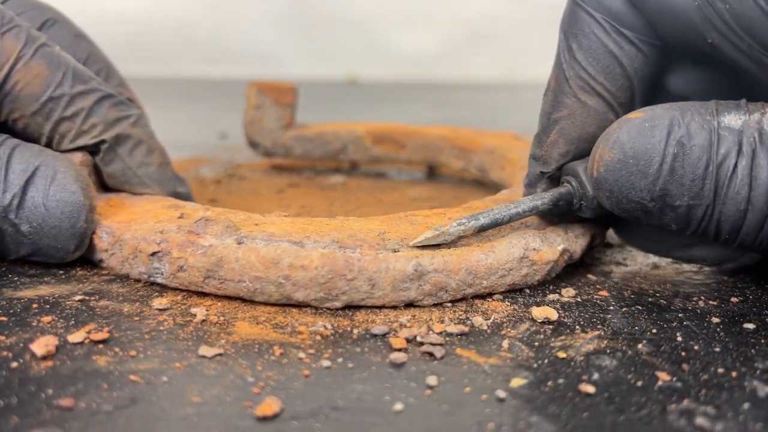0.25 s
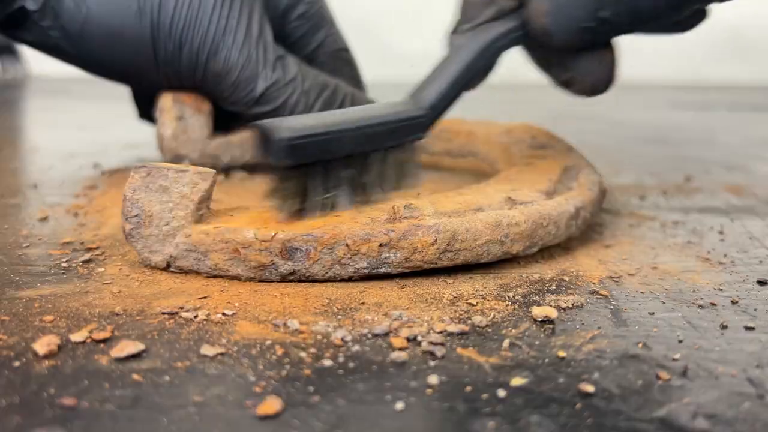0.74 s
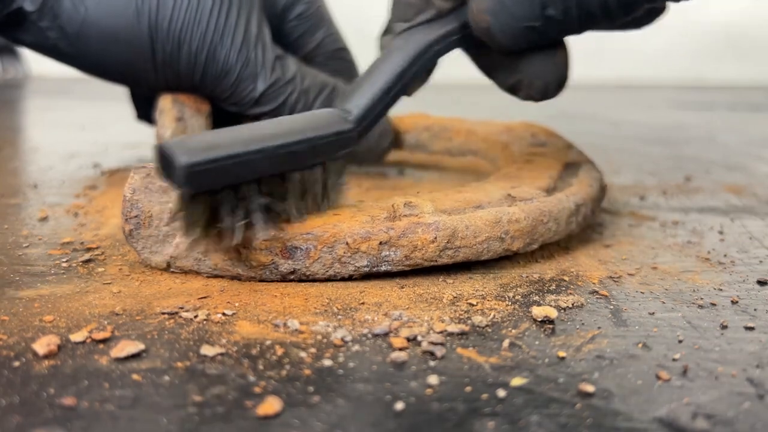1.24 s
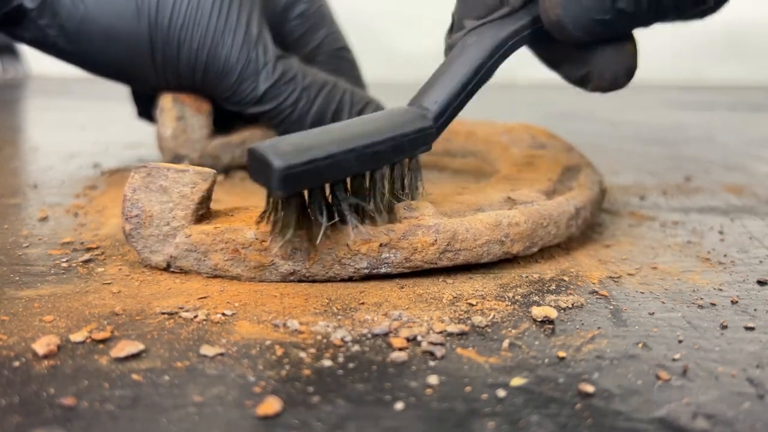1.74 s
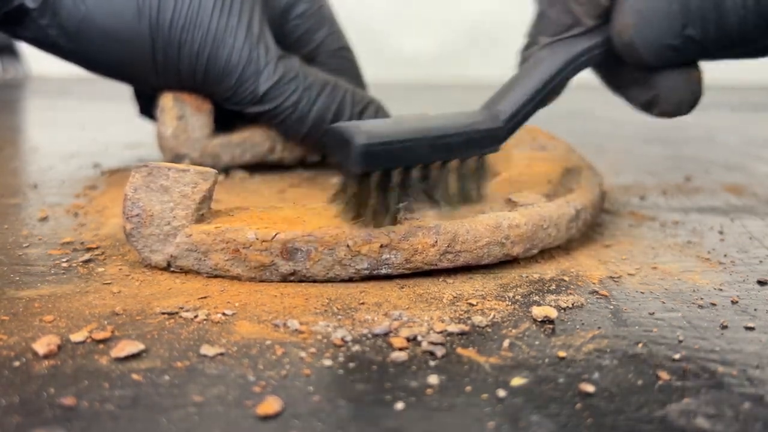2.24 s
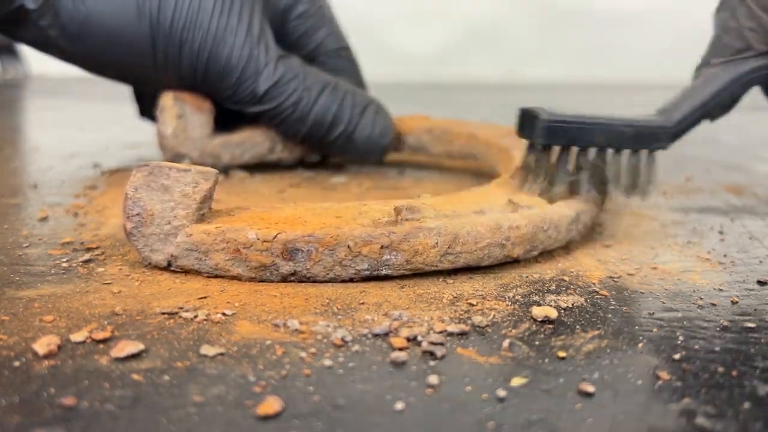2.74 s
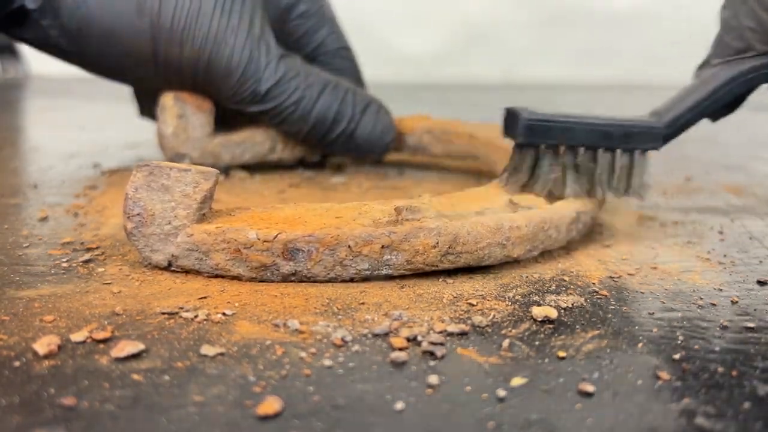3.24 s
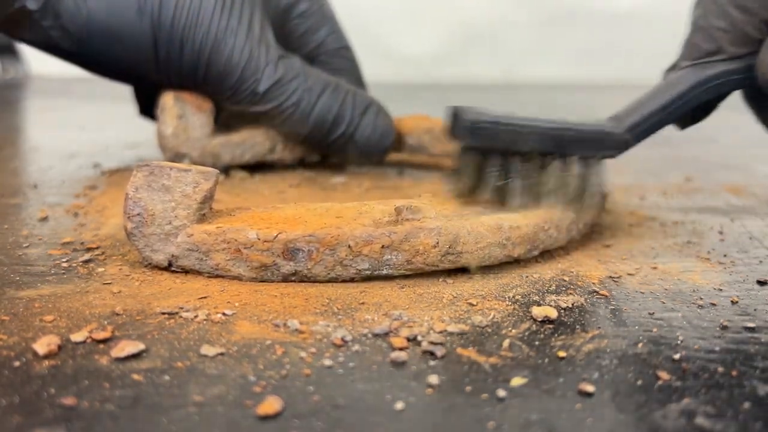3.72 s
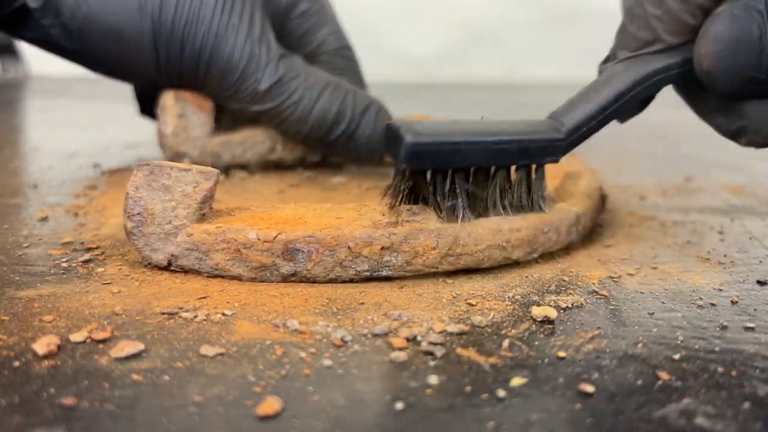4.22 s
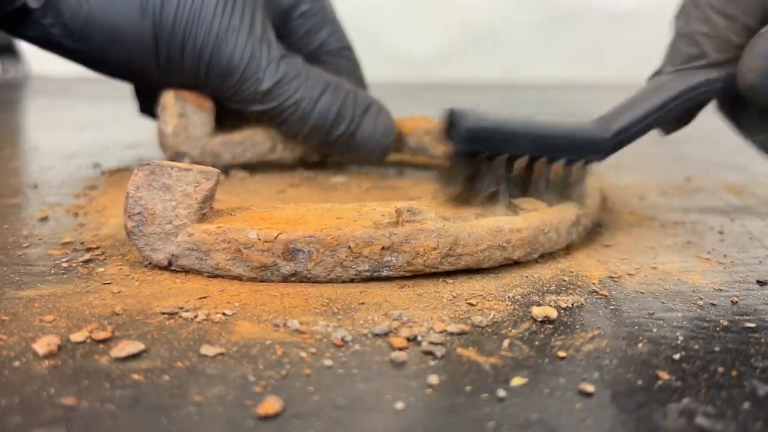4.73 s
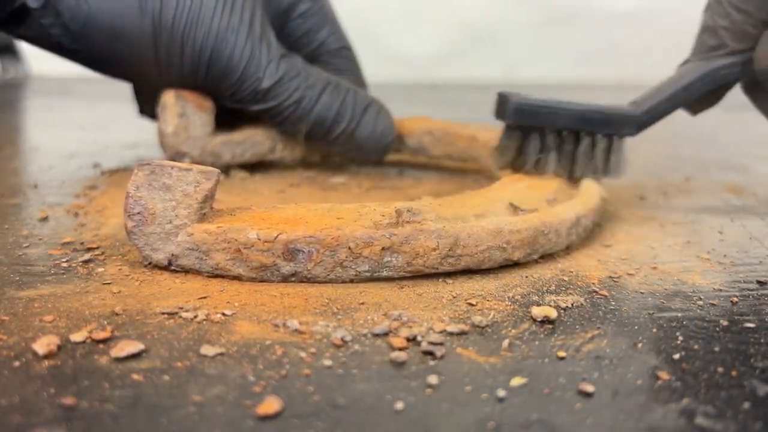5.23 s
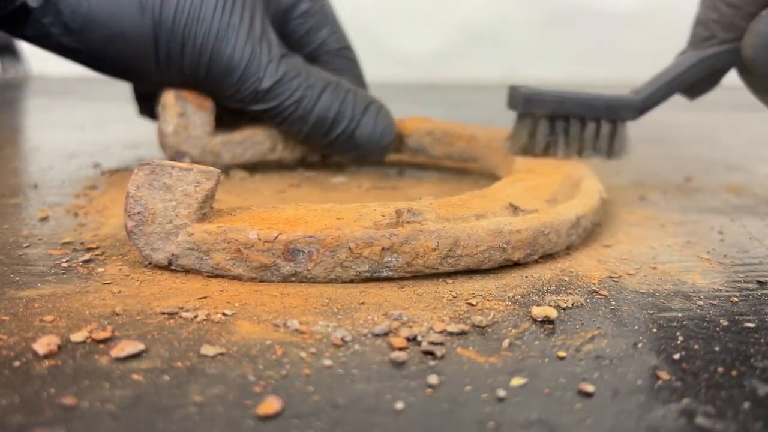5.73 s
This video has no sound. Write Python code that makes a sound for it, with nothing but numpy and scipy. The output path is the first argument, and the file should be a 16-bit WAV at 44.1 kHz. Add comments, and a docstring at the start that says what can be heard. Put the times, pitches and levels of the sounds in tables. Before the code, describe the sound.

First come several irregular cracks and faint grit from a pointed tool on rusty iron, strongest just before half a second. From about three quarters of a second, stiff bristles rasp quickly back and forth until the end, pulls and pushes differing slightly. Thin high metal ringing, occasional abrupt bristle bites, woody knocks and soft low thuds accompany it. Very close stereo pickup in a fairly dry workshop.

```python
"""A wire brush scrubs an old horseshoe to and fro on a workshop bench, close to a two-port microphone.
Bristle slips, as bunched noise, hiss, ring the iron's modes and shake the bench; tufts bite, the shoe knocks.
Before the brush a steel pick chips and scratches off rust: noise cracks, blows into the iron, fine grit.
Behind it all lies a short workshop tail; the two ports hear partly different sound."""
import sys
import numpy as np
from scipy import signal
from scipy.fft import rfft, irfft, next_fast_len
from scipy.io import wavfile
from scipy.ndimage import uniform_filter1d

SR = 44100
rng = np.random.default_rng(int(sys.argv[2]) if len(sys.argv) > 2 else 0)


def how_loud(loudness_db):
    """Turn decibels into a plain amplitude multiplier (0 dB gives 1, 20 dB gives 10)."""
    steps = np.asarray(loudness_db, float) / 20
    return 10 ** steps


def file_out(sig):
    """Save sig as 16-bit WAV at sys.argv[1]."""
    # one column per channel
    cols = np.atleast_2d(sig).T
    # limit, then scale
    lim = np.clip(cols, -1, 1)
    pcm = np.round(lim * 32767).astype(np.int16)
    wavfile.write(sys.argv[1], SR, pcm)


N = 263277
SIZE = next_fast_len(N + SR)
HZ = np.fft.rfftfreq(SIZE, 1 / SR) + 1e-3  # kept off zero
T = np.arange(N) / SR


def brush():
    """One hand force drives every brush sound: hiss, dull scratch, iron ring and shaken bench."""
    force, speed, middle = hand_strokes()
    dull_db = dull_levels()
    out = hiss(force) + dull_scratch(force, speed, middle, dull_db)
    out += iron_ring(force, middle, dull_db)
    shake = force * slips(2.0, 2.4, 45)
    return out + bench_chatter(shake, middle) + bench_rumble(shake, middle)


# Brush strokes at the shoe, pulls and pushes by turns: starting turn t/s, force level at that turn/dB
# (first row's unused), force level at full speed/dB, bench-top chatter relative level/dB
BRUSH_STROKES = [(0.68, -58, -42.5, -0.5), (0.828, -66, -40, -1.5), (0.984, -62.5, -45.5, 0.5),
                 (1.112, -63, -40.5, -0.5), (1.238, -63, -43.5, -2), (1.389, -63, -44.5, 3),
                 (1.525, -66, -41, -5), (1.661, -66, -43, 2.6), (1.8, -62, -43.5, -3),
                 (1.917, -61.5, -43, 0.5), (2.069, -67.5, -42.5, 0), (2.195, -66, -41.5, -2.5),
                 (2.336, -61, -43.5, -0.5), (2.489, -69, -45.5, 3.5), (2.615, -60.5, -42, -3.5),
                 (2.756, -62, -45, 4), (2.898, -70.5, -43.5, -2), (3.026, -58, -45.5, 5.2),
                 (3.174, -62, -42.5, -2.5), (3.291, -60.5, -42.5, -2.5), (3.443, -59, -43.5, 1.5),
                 (3.575, -64.5, -43, 2), (3.697, -59, -41.5, -4.5), (3.837, -58, -41.5, -0.5),
                 (4.009, -63, -42, -3), (4.149, -56, -44.5, -2.5), (4.27, -66, -43.5, 0),
                 (4.406, -56, -40.5, -8), (4.536, -62, -42.5, -2.5), (4.672, -56.5, -41, -5),
                 (4.8, -58, -40, -6), (4.928, -59.5, -41, -2.5), (5.077, -57, -41.5, -1.5),
                 (5.211, -60.5, -41, -1.5), (5.341, -56.5, -42, -4.5), (5.487, -59, -41.5, -11.5),
                 (5.625, -53.5, -41.5, -3), (5.748, -53.5, -43.5, -55.5), (5.885, -54.5, -38, -3)]
# Where in the stroke the brush is fastest: t/s, pull (0-1), push (0-1)
FASTEST_POINT = [(.8, .55, 0.48), (1.6, 0.48, 0.38), (2.8, 0.52, 0.53), (3.7, 0.45, 0.57), (5.5, 0.5, 0.6),
                 (5.9, 0.51, .45)]


def hand_strokes():
    """The hand swings like a pendulum: slow and quiet at each turn, loud in mid stroke."""
    last_turn_s, brush_down_s = 6.02, 0.743
    hold_share = 0.58  # force withheld just before a bite
    turn, slow_db, fast_db, _ = np.transpose(BRUSH_STROKES)
    edges = np.append(turn, last_turn_s)
    middle = (edges[1:] + edges[:-1]) / 2
    which = np.clip(np.searchsorted(edges, T) - 1, 0, len(turn) - 1)
    part = np.clip((T - edges[which]) / np.diff(edges)[which], 0, 1)
    # bend the stroke so that its half-way phase falls at the fastest point
    centre = by_direction(*np.transpose(FASTEST_POINT), middle)
    skew = np.log(0.5) / np.log(centre[which])
    speed = np.sin(np.pi * part ** skew) ** 0.53
    base_db = np.interp(T, turn[1:], slow_db[1:])
    force = how_loud(base_db + (fast_db[which] - base_db) * speed)
    force *= np.clip((T - brush_down_s) / 0.0014, 0, 1)
    for bite, *_, hold_s in TUFT_SNAGS:
        force *= 1 - hold_share * np.exp(-np.abs(T - bite) / hold_s) * (T < bite)
    return force, speed, middle


def dull_levels():
    """A push bears down harder than a pull; the dull scratch follows a louder stroke only in part."""
    typical_db, follows = -43, 0.56
    fast_db = np.transpose(BRUSH_STROKES)[2]
    pull_push_db = np.resize((-9.5, -6), len(fast_db))
    return pull_push_db - (1 - follows) * (fast_db - typical_db)


# Colour of the bristle slips: f/Hz, relative level per Hz/dB
BRISTLE_COLOUR = [(900, -25), (1500, -10.5), (3000, -7.5), (5000, -4.5), (7300, -4), (8500, -4), (9800, -6),
                  (11500, -2.5), (13500, -5.5), (15500, -3)]


def hiss(force):
    """The finest slips, heard above 8 kHz only."""
    fine = slips(1.8, 1.6, 150)
    return how_loud(4.5) * force * unit(through(fine, how_loud(along(BRISTLE_COLOUR)) * (HZ > 8000)))


def dull_scratch(force, speed, middle, dull_db):
    """Coarser slips below 8 kHz in five bands; they need speed, so they drop further at the turns."""
    limits = ((0, 1600), (1600, 2800), (2800, 4200), (4200, 5800), (5800, 8000))  # Hz
    bands = [how_loud(along(BRISTLE_COLOUR)) * (HZ > lo) * (HZ <= hi) for lo, hi in limits]
    dull = unit(patchy(slips(2.6, 2.2, 120), bands, 2.8, 30))
    return force * how_loud(np.interp(T, middle, dull_db) + 3 - 4.5 * (1 - speed)) * dull


# The shoe's modes: f/Hz
IRON_MODES = [727, 1850, 2390, 3617, 4317, 5200, 5587, 6150, 6390, 6870, 8250, 8350, 8650, 10780, 11955,
              12500, 13100, 15455]
# One row for each of them: t60/s, relative level under the brush/dB, relative level under the pick/dB,
# family (1 bending, 2 middle, 3 high, 4 driven like the dull scratch)
IRON_RING = [(0.095, -1.5, -13.5, 1), (0.027, -6, -5, 4), (0.03, -7, -10, 4), (0.03, -10, -41, 4),
             (0.025, -10, -24, 4), (0.04, -9, -10, 4), (0.061, -4.5, -16, 4), (0.062, 4, -4.5, 2),
             (0.035, -25, 5, 2), (.025, -14, -10, 2), (0.12, 12.5, -32, 3), (0.14, 9, -16, 3),
             (0.037, 9.5, 0.5, 3), (0.078, -10, -7, 3), (0.053, -24, 2, 3), (0.11, -9, -6, 3),
             (.05, -28, -16, 3), (0.072, 5, -4, 3)]
# Place on the shoe, as the brush travels round it: t/s, then relative level/dB of the
# bending mode, middle modes on a pull, on a push, high modes on a pull, on a push
PLACE_ON_SHOE = [(.8, -33, -11, -16, -1.5, -4), (1.35, -28, -8, -16, -0.5, -2),
                 (1.65, -32, -21, -7, -24, 2), (2.2, -23, -15.5, -18, -7, -4.5),
                 (2.6, -9.5, -13, -5.5, -15, -2.5), (3.1, -12, -13.5, -0.5, -10.5, -0.5),
                 (3.5, -14, -6, -5, 0.5, -7.5), (3.9, -12.5, -13.5, -3, -2, -5.5),
                 (4.4, -10.5, -13.5, -12, -7, -9), (4.8, -18, -4.5, -9, -6, -6),
                 (5.2, -14.5, -13.5, -11.5, -3, -5), (5.7, -20, -11.5, -20, -6.5, 1),
                 (5.95, -12, -15, 3, -9, 4)]


def iron_ring(force, middle, dull_db):
    """Bristle slips ring the shoe's modes; each family answers by the place that is brushed."""
    drive = force * slips(2.0, 1.8, 60)
    s, bend, mid_pull, mid_push, high_pull, high_push = np.transpose(PLACE_ON_SHOE)
    # family: (level at mid stroke/dB, gain/dB)
    families = {1: (np.interp(middle, s, bend), 33.7),
                2: (by_direction(s, mid_pull, mid_push, middle), 25.5),
                3: (by_direction(s, high_pull, high_push, middle), 11.6),
                4: (dull_db, 20.73)}
    out = np.zeros((2, N))
    for family, (family_db, gain_db) in families.items():
        modes = [resonance([(f, width(t60), db)])
                 for f, (t60, db, _, member) in zip(IRON_MODES, IRON_RING) if member == family]
        out += patchy(drive * how_loud(np.interp(T, middle, family_db) + gain_db), modes, 2.6, 22)
    return out


# The near end of the shoe under the brush lifts the three highest bench-top modes: t/s, relative level/dB
NEAR_END_LEVEL = [(.75, 6), (1.5, 5.5), (2.2, -1), (2.6, -6.5), (4, -8.5), (5.97, -5)]


def bench_chatter(shake, middle):
    """The whole shoe chatters on the bench top, which answers with low wooden modes."""
    shake_top = shake * how_loud(np.interp(T, middle, np.transpose(BRUSH_STROKES)[3]) + 22)
    near_end = how_loud(np.interp(T, *np.transpose(NEAR_END_LEVEL)))
    modes = bench_top()
    return patchy(shake_top, modes[:6], 3.2, 14) + through(shake_top * near_end, sum(modes[6:]))


# Whole-bench rumble: t/s, relative level on a pull/dB, relative level on a push/dB
BENCH_RUMBLE = [(.8, -8.5, 0), (1.7, -9.5, -5.5), (2.5, -6.5, -5.5), (3.0, -5.5, 0.5), (3.6, -6, 5),
                (4.3, -14, -1), (4.9, -15, -3), (5.4, -13.5, -5.5), (5.95, -6.5, -3)]
# The hand leaning on the far side swells the lowest bench mode: t/s, relative level/dB
HAND_LEAN = [(.75, -0.5), (2.5, 7), (3.5, -2), (4.4, 10.5), (5.97, 11)]


def bench_rumble(shake, middle):
    """The heavy bench answers the shaking 15 ms late."""
    late = np.exp(-2j * np.pi * HZ * 0.015)
    rumble_db = by_direction(*np.transpose(BENCH_RUMBLE), middle)
    shake_all = shake * how_loud(np.interp(T, middle, rumble_db) + 20)
    lean = how_loud(np.interp(T, *np.transpose(HAND_LEAN)))
    low, high = bench()
    return through(shake_all * lean, low * late) + through(shake_all, high * late)


# Tufts that hold fast after a turn and then bite all at once: bite t/s, relative level/dB,
# strongest colour f/Hz, hold t/s
TUFT_SNAGS = [(0.852, -35, 8000, 0.0076), (1.139, -46, 8000, 0.016), (1.685, -40, 6000, .015),
              (1.967, -42, 6000, 0.052), (2.103, -39, 6000, 0.0089), (2.507, -53, 6000, 0.0087),
              (2.937, -50, 5000, 0.017), (3.03, -35, 1400, 0.0055), (3.473, -40, 8000, 0.018),
              (3.705, -32.5, 6000, 0.0088), (4.187, -32, 6000, 0.018), (5.89, -29, 1500, 0.0063)]


def snags():
    """A bite is a noise burst that starts at once and melts into the stroke."""
    out = np.zeros((2, N + SR))
    t = np.arange(SR // 10) / SR
    for s, db, knee_hz, _ in TUFT_SNAGS:
        i = int(s * SR)
        out[:, i:i + len(t)] += how_loud(db - 9) * burst(len(t), knee_hz, 3, -6) * fade(t, 0.045)
    return out[:, :N]


# The shoe rocks and knocks on the bench top: t/s, relative level/dB, f/Hz (the nearest bench-top mode answers)
SHOE_KNOCKS = [(0.853, -44, 396), (1.422, -39, 444), (1.698, -34.5, 452), (1.86, -32.5, 439),
               (1.964, -39.5, 385), (2.101, -36, 452), (2.259, -48, 439), (2.403, -34.5, 517),
               (2.941, -38, 388), (3.222, -36, 452), (3.328, -38, 420), (3.492, -28, 455),
               (4.188, -34.5, 423.5), (4.575, -31, 538), (4.774, -28, 441), (4.84, -30, 536),
               (5.003, -34, 218), (5.106, -29.5, 447)]
# The hand's weight lands on the bench: t/s, relative level/dB, rise t/s
HAND_THUDS = [(1.71, -44, 0.028), (2.267, -36.5, 0.03), (3.379, -37, 0.045), (3.638, -44, 0.035),
              (3.929, -46, 0.042), (4.451, -36, 0.035), (4.988, -42, 0.05), (5.069, -37, 0.039),
              (5.286, -34, 0.04), (5.544, -31, 0.043), (5.649, -36, 0.035), (5.761, -29, 0.037),
              (5.829, -38, 0.04)]


def knocks():
    """A knock rings the nearest bench-top mode, a thud the whole bench."""
    thuds = sum(shove(s, db + 13, rise_s) for s, db, rise_s in HAND_THUDS)
    out = through(thuds, sum(bench()) / (1 + (HZ / 190) ** 4))
    nearest = [np.argmin(np.abs(np.array(BENCH_TOP_MODES) - hz)) for _, _, hz in SHOE_KNOCKS]
    modes = bench_top()
    for k in set(nearest):
        mode_db = BENCH_TOP_RING[k][1]
        pushes = sum(shove(s, db + 21.5 - mode_db, 0.011)
                     for (s, db, _), j in zip(SHOE_KNOCKS, nearest) if j == k)
        out += through(pushes, modes[k])
    return out


def shove(s, db, rise_s):
    """A short rough push, noise under a bell curve that peaks rise_s after s."""
    return how_loud(db) * np.exp(-((T - s - rise_s) / rise_s) ** 2) * rng.standard_normal((2, N))


# Chips struck off by the pick: t/s, level/dB, bench sway re that/dB, ring re that/dB,
# strongest colour f/Hz, treble tilt of the crack/dB per octave
PICK_CHIPS = [(0.0718, -22, -16, -17.5, 1950, -10.5), (0.2414, -35, -44, -10.5, 1230, -16.5),
              (0.266, -39, -31, -19, 1200, -21), (0.3592, -16, -58, -3.5, 2500, -18),
              (0.4235, -8.5, -39.5, -8, 2300, -4.5), (0.543, -37.5, -33, -16, 2500, -2),
              (0.56, -20, -46, -34, 9100, 9), (0.572, -27.5, -50, -31, 9000, 1),
              (0.6327, -50, -29, -37, 9000, -16), (0.733, -46, -41, -17, 9000, -5)]


def pick():
    """Each chip is a sharp crack with crumbling after it, a blow into the iron and a late sway of the bench."""
    sway_hz, sway_peak_s = 74.9, 0.032
    out, blows = np.zeros((2, N)), np.zeros((2, N))
    t = np.arange(SR // 5) / SR
    swell = (t / sway_peak_s * np.exp(1 - t / sway_peak_s)) ** 2
    sway = swell * (np.sin(2 * np.pi * sway_hz * t) - 0.33 * np.cos(4 * np.pi * sway_hz * t))
    for s, db, sway_db, ring_db, knee_hz, tilt_db in PICK_CHIPS:
        i = int(s * SR)
        crack = burst(len(t), knee_hz, 20, tilt_db) * np.minimum(t / 0.0008, 1) * fade(t, 0.009)
        crumble = burst(len(t), knee_hz, 4, tilt_db - 6) * fade(t, 0.06)
        out[:, i:i + len(t)] += how_loud(db) * (crack + how_loud(-22.5) * crumble + how_loud(sway_db) * sway)
        # loose scale rattles on as noise round 5.6 kHz, fainter after a duller chip
        rattle = burst(len(t), 5600, 40, -18) * fade(t, 0.26)
        out[:, i:i + len(t)] += how_loud(db + ring_db + tilt_db - 17) * rattle
        # a duller chip is a longer push, which drives the high modes less
        push_samples = np.clip(0.3 - 0.15 * tilt_db, 0.3, 8)
        push = (t[:64] + 1 / SR) * np.exp(-t[:64] * SR / push_samples)
        blows[:, i:i + 64] += how_loud(db + ring_db) * push / push.sum()
    # offset each level by bandwidth, so that a mode's starting level does not depend on its width
    iron = [(f, width(t60), db + 20 * np.log10(SR / 2 / np.pi / width(t60)))
            for f, (t60, _, db, _) in zip(IRON_MODES, IRON_RING)]
    return out + through(blows, resonance(iron) + how_loud(27) * sum(bench_top()))


# The point dragged through the rust: t/s, grit level/dB, bench murmur level/dB
POINT_DRAG = [(0, -82, -62), (.025, -64, -62), (.06, -71, -74), (0.083, -64, -38.5), (.14, -79, -64),
              (.2, -66, -66), (.25, -65.5, -59), (.33, -60, -56.5), (.46, -62, -47), (.53, -68, -61.5),
              (.58, -69, -58.5), (.66, -62.5, -66), (.7, -73.5, -65), (.74, -69, -64)]
# Short spills of the finest grit: start t/s, length t/s, level/dB
GRIT_SPILLS = [(0.071, 0.032, -57), (0.35, .11, -64), (.548, .035, -61), (.59, 0.087, -70),
               (0.73, .03, -75)]


def scratch():
    """Fine grit under the point, with the bench murmuring below; a trace of it stays under the brush."""
    s, grit_db, bench_db = np.transpose(POINT_DRAG)
    spill = sum(how_loud(db) * ((T > start) & (T < start + length)) for start, length, db in GRIT_SPILLS)
    spill = how_loud(-80.5) + uniform_filter1d(spill, int(0.02 * SR))  # steady floor, 20 ms edges
    grit = slips(1.6, 1.8, 80)
    below = 1 / (1 + (HZ / 8200) ** 12)  # splits body from the finest grit
    body = unit(through(grit, below * resonance([(1360, 130, 5), (2355, 180, 7), (5600, 9900, -7)])))
    fine = unit(through(grit, 1 - below))
    murmur = unit(through(slips(0.63, 3.2, 28), sum(bench()) + how_loud(-13) * sum(bench_top())))
    return how_loud(np.interp(T, s, grit_db)) * body + spill * fine + how_loud(np.interp(T, s, bench_db)) * murmur


# Bench-top modes near the shoe: f/Hz
BENCH_TOP_MODES = [235, 308, 400, 452, 545, 660, 839, 965, 1145]
# One row for each of them: width f/Hz, relative level/dB
BENCH_TOP_RING = [(42.7, -13), (40.5, -5.5), (38.5, -6.5), (24.5, 1.5), (32.4, -1.5), (29.8, -11.5),
                  (35.2, -8), (45, -14.5), (46.296, -15.5)]


def bench_top():
    """Responses of the bench-top modes near the shoe; the thick wood passes little above each."""
    return [resonance([(f, *row)]) / (1 + (HZ / f / 1.34) ** 4)
            for f, row in zip(BENCH_TOP_MODES, BENCH_TOP_RING)]


# Modes of the whole bench: f/Hz, width f/Hz, relative level/dB
WHOLE_BENCH = [(74, 26, 0), (133, 38, 2)]


def bench():
    """Responses of the whole bench's modes; it is too small to radiate the deepest bass."""
    return [resonance([mode]) / (1 + (48 / HZ) ** 2) for mode in WHOLE_BENCH]


def slips(rough_db, flutter_db, rate):
    """Two unrelated streams of tiny slips: uneven in size, arriving in bunches as tufts catch and let go."""
    size = how_loud(rough_db * rng.exponential(size=(2, N)) + flutter_db * wander(rate))
    return unit(rng.standard_normal((2, N)) * size)


def wander(rate):
    """Random levels held 1 / rate s and slewed."""
    k = int(SR / rate)
    return uniform_filter1d(np.repeat(rng.standard_normal(N // k + 1), k)[:N], k)


def patchy(x, responses, patchy_db, rate):
    """Each response is driven harder or softer by turns, as the bristles land on other spots."""
    total = sum(rfft(x * how_loud(patchy_db * wander(rate)), SIZE) * response for response in responses)
    return irfft(total, SIZE)[:, :N]


def burst(length, knee_hz, rise_db, tilt_db):
    """Two short noises, strongest at the knee, with slopes in dB per octave below and above it."""
    octave = np.log2(np.fft.rfftfreq(length, 1 / SR) / knee_hz + 1e-3)
    colour = how_loud(tilt_db * np.maximum(octave, 0) + rise_db * np.minimum(octave, 0))
    return unit(irfft(rfft(rng.standard_normal((2, length))) * colour, length))


def fade(t, t60):
    """Exponential decay by 60 dB in t60 seconds."""
    return 1000.0 ** (-t / t60)


def width(t60):
    """Bandwidth in Hz of a mode that dies 60 dB in t60."""
    return np.log(1000) / np.pi / t60


def resonance(modes, sign=-1):
    """Sum of (Hz, width, dB) resonators; sign -1 fills the valleys between them, 1 leaves notches."""
    total = 0
    for k, (f, w, db) in enumerate(modes):
        total = total + sign ** k * how_loud(db) * 1j * HZ * w / (f * f - HZ ** 2 + 1j * HZ * w)
    return total


def along(table):
    """A (Hz, value) table read at every frequency bin, on a log frequency axis."""
    hz, value = np.transpose(table)
    return np.interp(np.log(HZ), np.log(hz), value)


def through(x, response):
    """Filter by a frequency response."""
    return irfft(rfft(x, SIZE) * response, SIZE)[..., :N]


def unit(x):
    """Scale to rms 1."""
    return x / np.sqrt(np.mean(x ** 2))


def by_direction(s, pull, push, at):
    """Read a pull curve for even strokes and a push curve for odd ones."""
    return np.where(np.arange(len(at)) % 2, np.interp(at, s, push), np.interp(at, s, pull))


def workshop():
    """Response of the close sound plus a short noise tail, 18 dB down, that begins after 4 ms."""
    t = np.arange(SR // 3) / SR
    tail = rng.standard_normal(len(t)) * fade(t, 0.14) * (t > 0.004)
    tail = tail / np.sqrt(np.sum(tail ** 2))
    return 1 + how_loud(-18) * rfft(tail, SIZE) * resonance([(2500, 11500, 0.0074)])


# Likeness of the two microphone ports: f/Hz, likeness setting (1 = fully shared)
PORT_LIKENESS = [(60, 1), (290, 0.85), (640, 0.13), (1400, 0.12), (3100, 0.074), (6000, 0.073), (7400, 0.5),
                 (8200, 1)]
# Balance of the ports: f/Hz, left minus right level/dB
PORT_BALANCE = [(60, 2.5), (110, 0), (200, -0.5), (380, 1.5), (700, 4.5), (1290, -0.5), (2380, 3.5),
                (4400, 4), (8120, 1.5), (15000, -0.5)]
# Lead of the right port over the left: f/Hz, lead in cycles (negative: the left leads)
PORT_LEAD = [(6400, 0), (7100, -.25), (8330, 0), (10200, .5), (12000, 1), (13830, 1.5), (15600, 2)]


def two_ports(near):
    """A shared and an unshared stream, blended per frequency into the left and right ports."""
    shared, own = rfft(near, SIZE) * workshop()
    like = np.clip(along(PORT_LIKENESS), 0, 1)
    # the unshared part, a quarter cycle round, enters the ports with opposite signs
    own = 1j * (0.11 * shared + 0.8 * own) * np.sqrt((1 - like) / 2)
    shared = shared * np.sqrt((1 + like) / 2)
    # half of the balance and of the lead goes to each port
    lead = np.interp(HZ, *np.transpose(PORT_LEAD))
    turn = how_loud(along(PORT_BALANCE) / 2) * np.exp(-1j * np.pi * lead)
    return irfft(np.array([(shared + own) * turn, (shared - own) / turn]), SIZE)[:, :N]


def scene():
    """Brush, snags, knocks, pick and scratch, heard close by the two ports in the workshop."""
    return two_ports(brush() + snags() + knocks() + pick() + scratch())


def low_pass(x):
    """Removes everything above the highest recorded frequency."""
    return signal.sosfilt(signal.butter(12, 17130, fs=SR, output="sos"), x)


def record(dry):
    """The microphone chain cuts steeply above 15.7 kHz."""
    steep = signal.ellip(12, 0.2, 70, 15700, fs=SR, output="sos")
    mix = signal.sosfilt(steep, dry)
    return low_pass(mix)


dry = scene()
out = record(dry)
file_out(out)
```